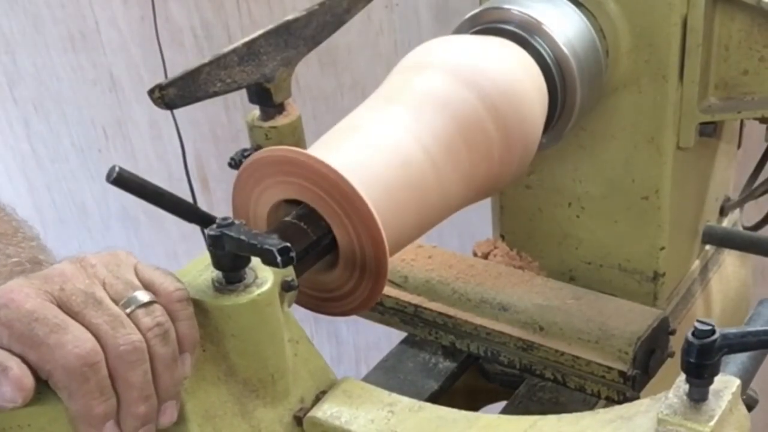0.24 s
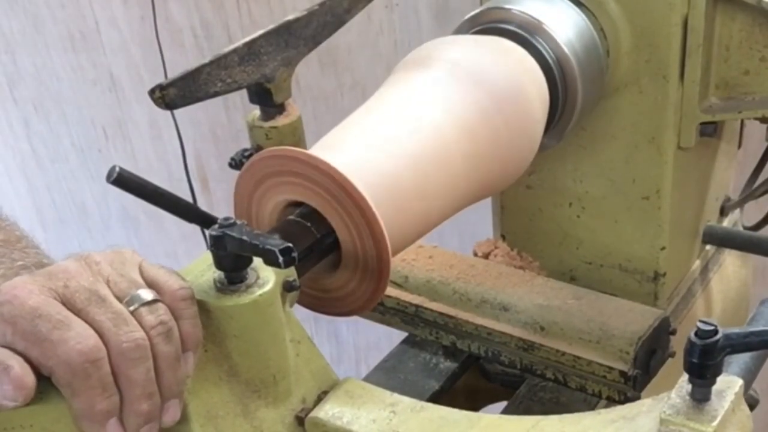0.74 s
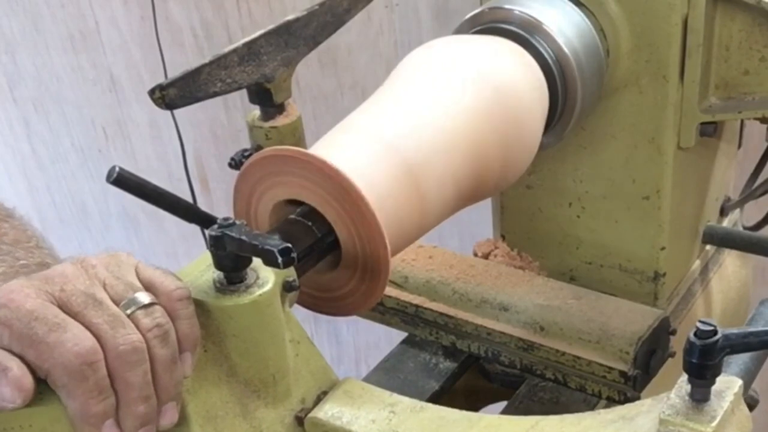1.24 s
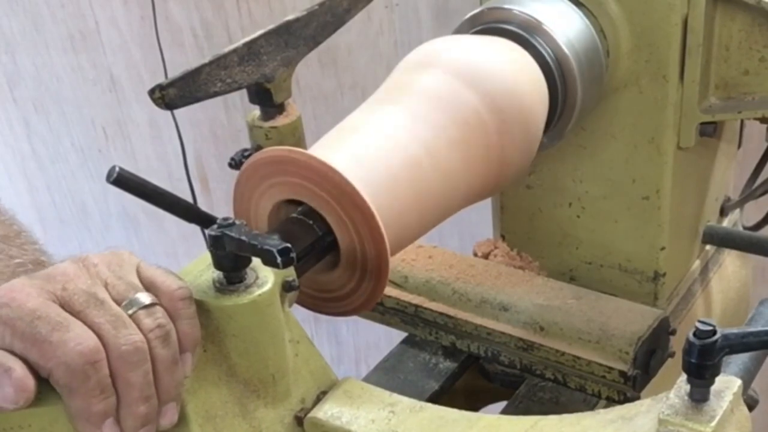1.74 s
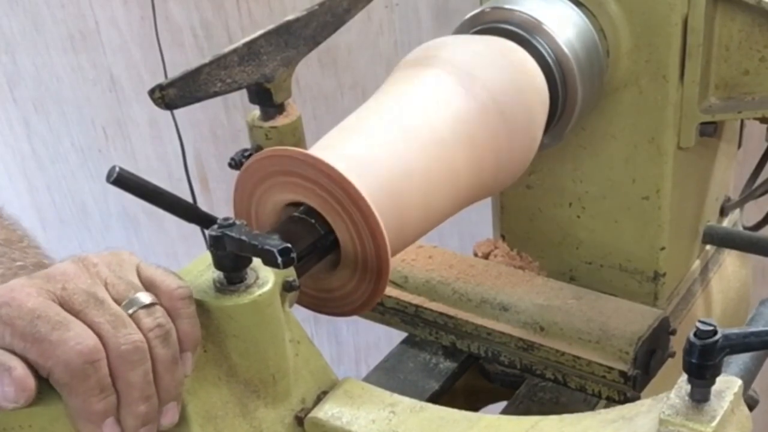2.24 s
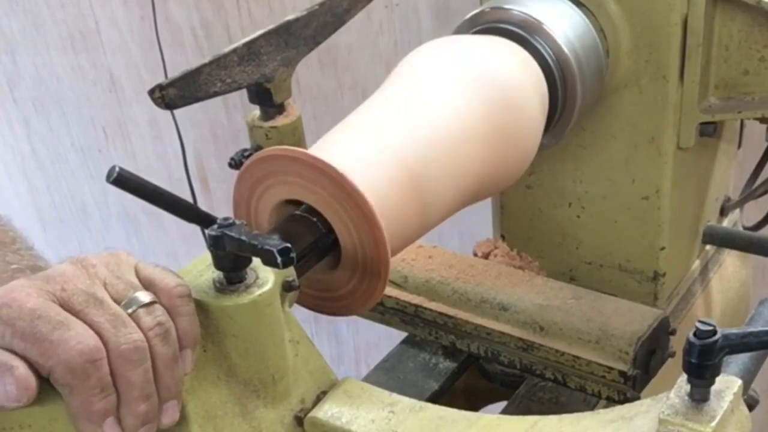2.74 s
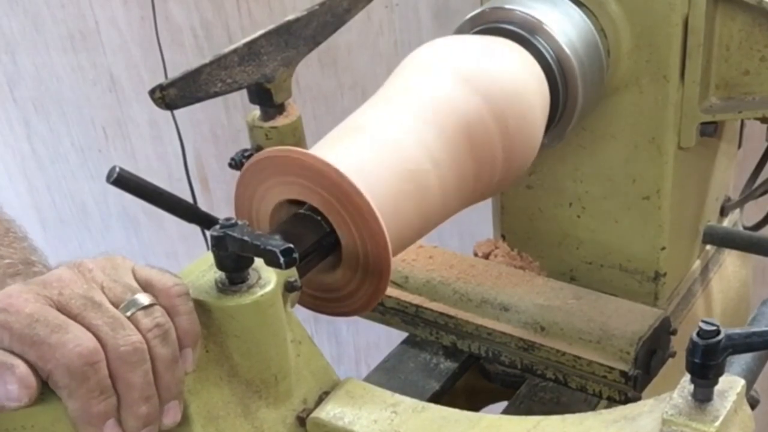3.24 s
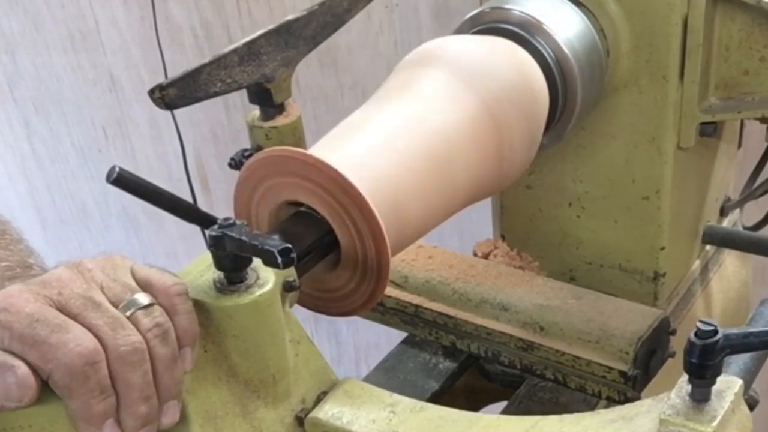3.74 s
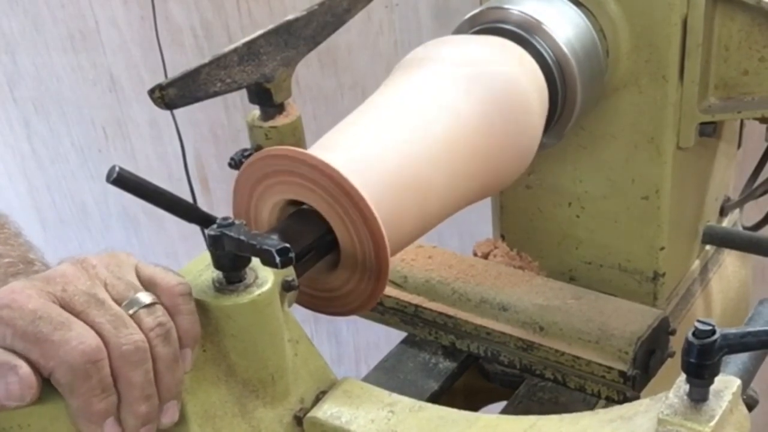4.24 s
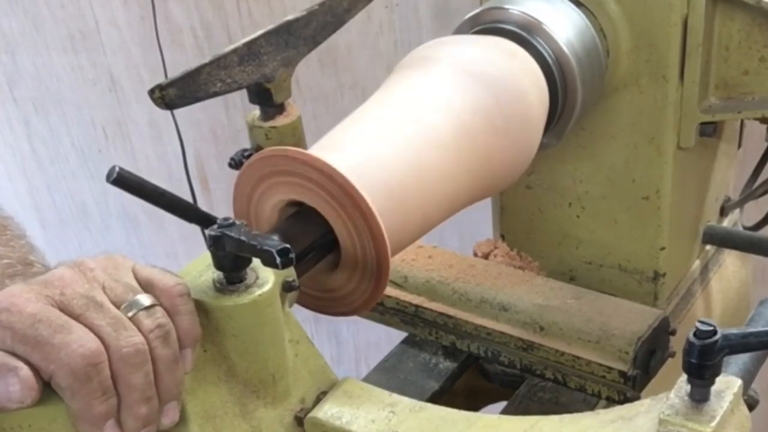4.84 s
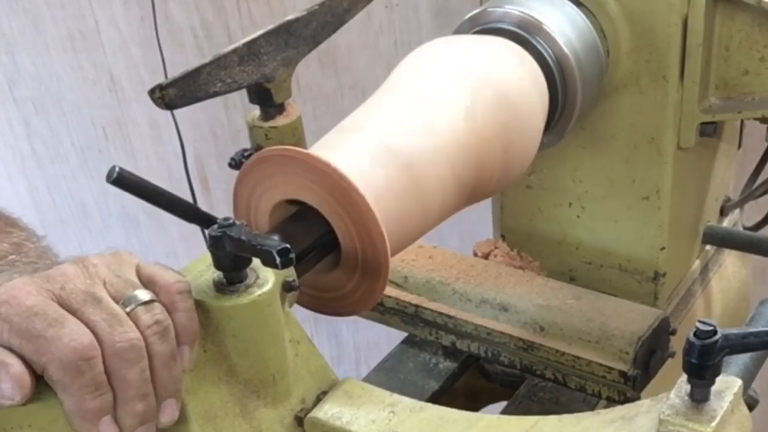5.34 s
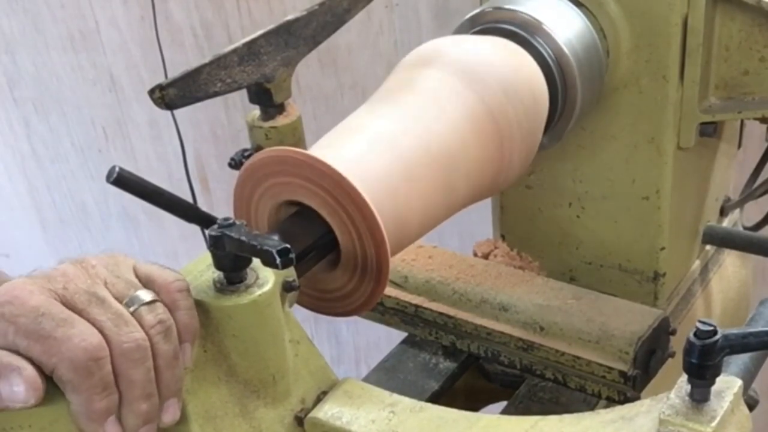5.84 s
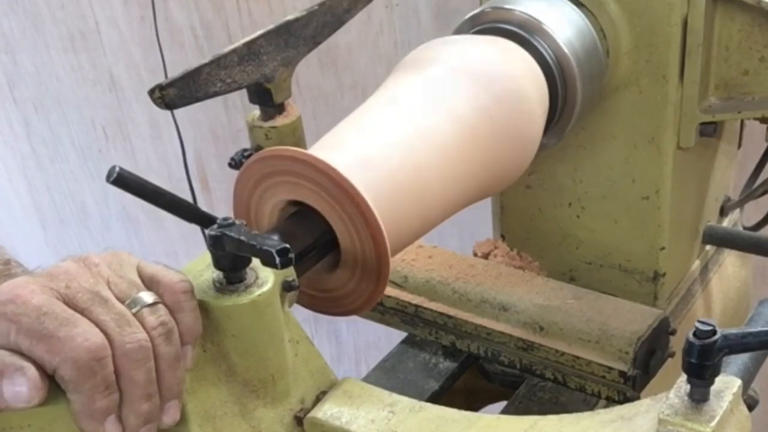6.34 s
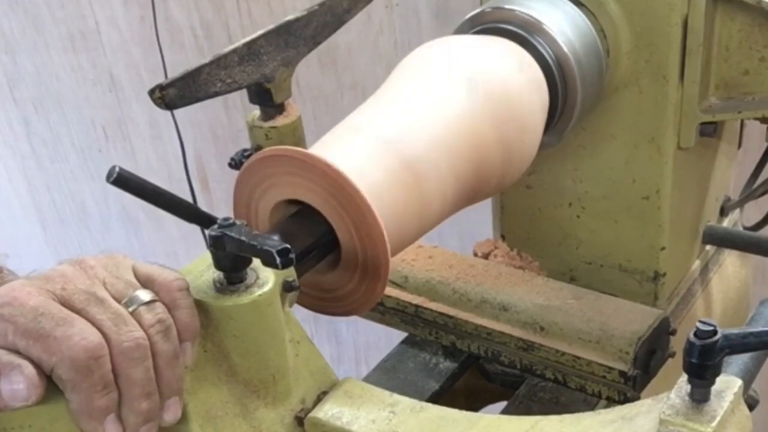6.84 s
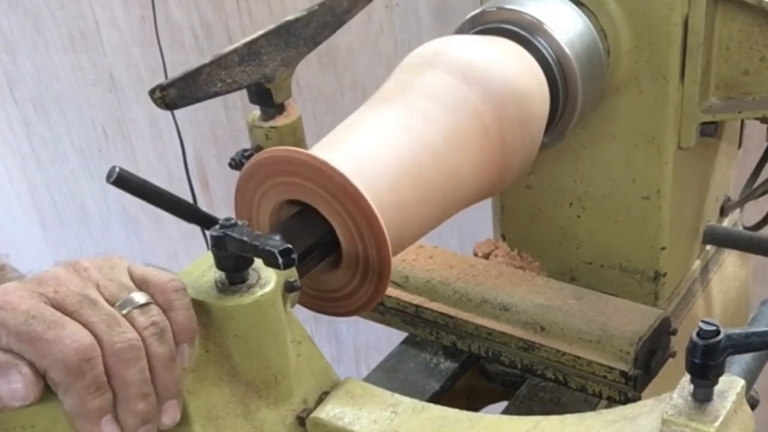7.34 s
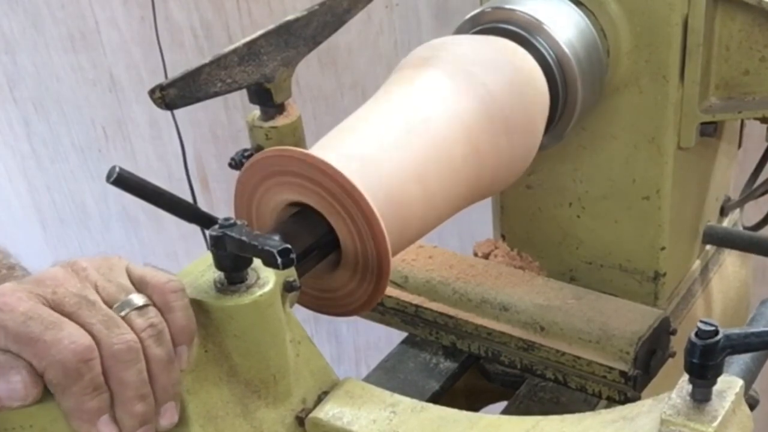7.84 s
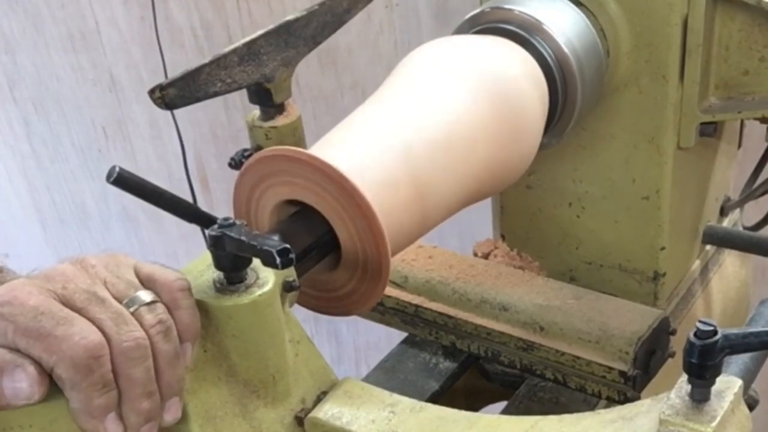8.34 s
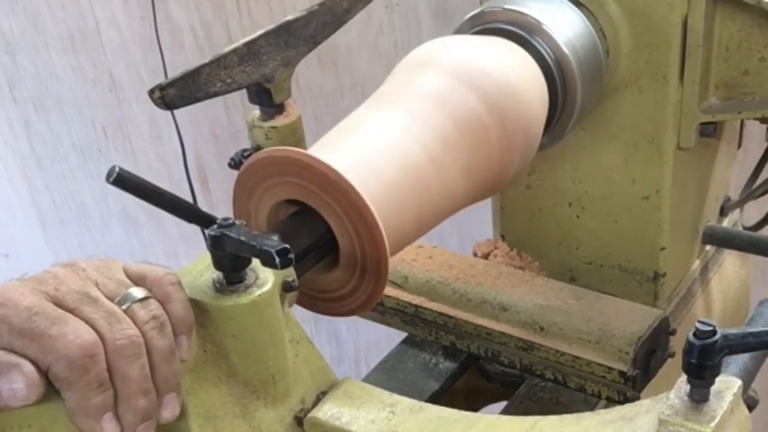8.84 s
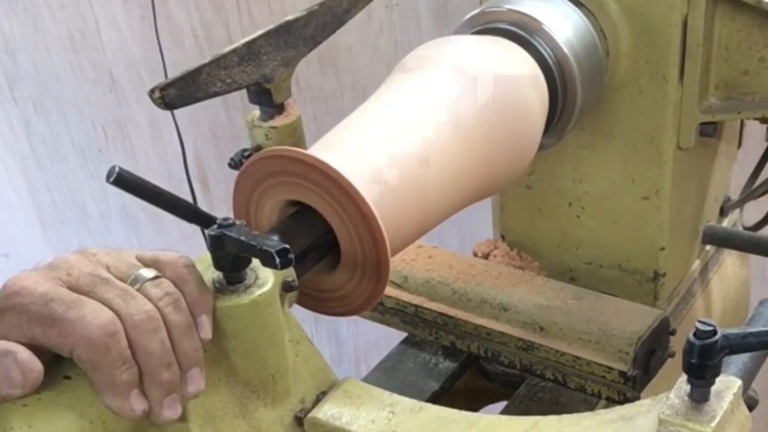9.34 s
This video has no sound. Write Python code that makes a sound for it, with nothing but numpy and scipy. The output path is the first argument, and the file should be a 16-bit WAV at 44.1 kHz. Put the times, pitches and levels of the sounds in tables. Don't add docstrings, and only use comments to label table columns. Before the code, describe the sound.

A hollowing tool bursts into pulsing squeals inside a spinning wooden vase, settles into long throbbing fibrous hiss, then stutters out over a low machine drone.

```python
import sys
import numpy as np
from scipy import signal
from scipy.fft import rfft, irfft, next_fast_len
from scipy.io import wavfile
from scipy.ndimage import uniform_filter1d, map_coordinates

SR = 44100
rng = np.random.default_rng(int(sys.argv[2]) if len(sys.argv) > 2 else 0)


def transcribe(u):
    v = np.clip(np.atleast_2d(u).T, -1, 1)
    q = np.round(v * 32767).astype(np.int16)
    wavfile.write(sys.argv[1], SR, q)


def invert_db(level):
    return 10 ** (np.asarray(level, dtype=float) / 20)


N = 423360
TIME = np.arange(N) / SR

TURNS_HZ = 14.6
# [t/s, offset/turns]
HIGH_SIDE = [(.6, 0.36), (1, 0.24), (1.4, 0.011), (2.2, -0.074), (3.4, -0.0083), (5.3, -0.017),
             (5.76, 0.071), (5.82, -0.43), (7, -0.304), (8.4, -0.38), (8.75, -.33), (9.15, -.22),
             (9.4, -.26)]
HARD_SPOTS = [
    (-.24, 1.35, 0.19, 1),
    (.03, 1.1, 0.19, 0),
    (.3, .25, .17, 0),
]
# [start t/s, end t/s, first bite level/dB, last bite level/dB,
# once-a-turn pulsing level/dB]
PUSHES = [(0.51, 1.05, -61.5, -60, 3.5), (1.062, 1.254, -65, -66, 1), (1.237, 2.317, -59.5, -59.5, 3.5),
          (2.286, 3.205, -58, -51.5, 4.5), (3.204, 4.38, -51.5, -51, 5), (4.426, 5.044, -51, -52.5, 4),
          (5.787, 6.162, -68, -56.5, 0.5), (6.15, 6.502, -59.5, -62.5, -0.5), (6.502, 6.76, -64.5, -73, -3),
          (7.13, 7.234, -74, -61.5, -6), (7.258, 7.698, -59.5, -64, 1), (7.73, 8.055, -59, -60, 2),
          (8.058, 8.2, -65.5, -77, 1.6), (8.569, 8.62, -69, -61.5, 4), (8.71, 9.173, -58, -63, 14.5),
          (9.17, 9.424, -77.5, -65, 24)]
EDGE_S = 0.018
TOUCH_S, LIFT_S = 0.483, 8.5
RESTING_DB, RESTING_PULSE_DB, CLEAR_DB = -71.5, 2, -90
# [f/Hz, level/dB per Hz]
RASP = [(900, -53), (1500, -29), (1750, -4), (2000, -0.5), (2300, 1.5), (2800, 0.5), (4100, -10),
        (5500, -11), (8000, -14), (15600, -54)]
# [f/Hz, level/dB per Hz]
HISS = [(1500, -74), (3000, -28.5), (4200, 0), (5500, -5), (7000, -3.5), (8900, 0), (9500, -6), (10700, -2),
        (13000, -6), (15600, -8.5)]
# [f/Hz, width/Hz, level/dB]
MODES_OF_WORK = [(1940, 35, 4.5), (2020, 19, 8.5), (2460, 20, -5), (2770, 49, -4), (2870, 130, 4),
                 (3024, 53, 5.5), (3490, 310, 6), (3600, 133, 5.5), (3930, 99, 4), (4193, 32, 2),
                 (4520, 66, -7), (5080, 30, -6), (5394, 120, 3), (5660, 210, -5), (6340, 126, -2),
                 (7800, 53, -37), (8250, 58, 2.5), (8660, 79, -0.5), (10450, 100, -3), (12160, 170, -4),
                 (14000, 67, 4)]
RASP_DB, RASP_FOLLOWS = -51, 0.47
FRESH_DB, FRESH_S = 7.5, 0.29
RASP_SKIPS, SKIPPING_DB = 0.6, 10.5
SKIP_S = .018
CROSS_HZ = 7800
RASP_PULSES, CHIPS_PULSE, DUST_PULSES = 1.05, 1.25, 1.3

# [middle t/s, tone level/dB, pitch f/Hz, slap level/dB]
ENTERING = [(.002, -53.5, 1660, -25), (.066, -61, 1682, -13), (.189, -51.5, 1684, -8.5),
            (.215, -52, 1610, -26), (.52, -30, 1838, -5.5), (.54, -34, 1810, -9.5), (.581, -27, 1828, -5.5),
            (.611, -37, 1800, -23), (.65, -35.5, 1775, -7.5), (.727, -24, 1870, -10.5),
            (.799, -26, 1888, -11.5), (.87, -28, 1913, -13), (.93, -27.5, 1887, -8), (.99, -30.5, 1904, -9),
            (1.063, -42, 1935, -20.5), (1.21, -33.5, 1936, -13), (1.278, -32, 1932, -14),
            (1.347, -39, 1936, -17), (1.414, -30.5, 1935, -13.5), (1.482, -37.5, 1936, -21),
            (1.611, -44.5, 1963, -12), (1.684, -39, 1943, -11.5), (1.752, -46, 1947, -12.5),
            (1.823, -28.5, 1928, -13.5), (1.896, -30.5, 1935, -17), (1.958, -35.5, 1945, -27),
            (2.011, -53, 1990, -14), (2.088, -47.5, 1990, -20.5), (2.156, -43, 1965, -16),
            (2.218, -50, 2004, -9)]
# [middle t/s, tone level/dB, pitch f/Hz, slap level/dB]
LEAVING = [(5.594, -59, 1860, -8), (5.656, -62, 1877, -14), (5.722, -42, 1824, -10), (5.762, -49, 1678, -7),
           (5.783, -44.5, 1810, 3), (5.833, -40, 1700, -10), (5.862, -38, 1812, -2.5),
           (5.967, -42, 1928, -13.5), (6.724, -46, 1972, -15), (6.793, -49, 1963, -8.5),
           (6.872, -41, 1950, -13.5), (6.956, -36, 1950, -15.5), (7.02, -29.5, 1922, -15.5),
           (7.081, -30, 1948, -11.5), (8.537, -45, 1820, -6.5), (8.588, -35, 1779, -2.5),
           (8.66, -40, 1720, -0.5), (8.726, -37, 1717, 2), (8.795, -37.5, 1714, 0.5),
           (8.862, -40, 1720, 2.5), (8.926, -41, 1718, 5), (8.992, -45, 1690, 5.5),
           (9.06, -40.5, 1707, 5.5), (9.13, -43, 1720, 5.5), (9.197, -44, 1623, 1.5),
           (9.227, -51, 1618, -25), (9.268, -37.5, 1601, -3.5), (9.336, -39.5, 1613, -1),
           (9.406, -41, 1608, 0), (9.449, -49, 1608, -8)]
BURST_S, LONGER_S_PER_DB, HARD_SLAP_DB, LONGEST_S = .027, -0.1, -7, .044
BACK_OUT_S, SHORTER = 9.17, .75
# [middle t/s, level/dB, half width/s]
SWELLS_IN = [(0.519, -25.5, 0.011), (0.533, -25.5, 0.0058), (0.547, -31, 0.0055), (0.565, -32, 0.027),
             (0.582, -22, 0.0048), (0.606, -29, 0.026), (0.641, -32, 0.017), (0.661, -27.5, 0.0063),
             (0.675, -42, 0.0053), (0.689, -43, 0.006), (0.718, -25.5, 0.0089), (0.736, -20, 0.0058),
             (0.745, -35, 0.018), (0.801, -24.5, 0.012), (0.844, -38, 0.006), (0.873, -25, 0.019),
             (0.922, -25.5, 0.012), (0.94, -22.5, 0.0057), (0.956, -31, 0.0088), (0.987, -26.5, 0.009),
             (1.014, -40, 0.0089), (1.031, -45, 0.006), (1.053, -43.8, 0.006), (1.068, -38.5, 0.009),
             (1.21, -29, 0.017), (1.239, -39, 0.03), (1.278, -26, 0.015), (1.345, -34, 0.012),
             (1.394, -38, 0.0069), (1.414, -28, 0.014), (1.44, -44, 0.03), (1.482, -33, 0.016),
             (1.598, -42.8, 0.008), (1.614, -40.3, 0.007), (1.628, -46, 0.006), (1.684, -38.5, 0.016),
             (1.754, -42, 0.014), (1.824, -24.5, 0.015), (1.859, -47.9, 0.03), (1.897, -28, 0.018),
             (1.959, -33.2, 0.013), (2.012, -45, 0.006), (2.084, -42, 0.006), (2.157, -41, 0.014),
             (2.219, -46.5, 0.006)]
# [middle t/s, level/dB, half width/s]
SWELLS_OUT = [(5.719, -40, 0.012), (5.746, -41, 0.006), (5.762, -38.2, 0.01), (5.779, -37, 0.0056),
              (5.801, -39.5, 0.016), (5.84, -37, 0.025), (5.866, -31, 0.028), (5.902, -43, 0.027),
              (5.937, -51, 0.014), (5.967, -38.5, 0.013), (6.717, -43.5, 0.007), (6.732, -43.5, 0.008),
              (6.86, -39, 0.0085), (6.879, -43, 0.018), (6.917, -46, 0.006), (6.934, -43, 0.0054),
              (6.956, -38.5, 0.018), (7.001, -36.1, 0.006), (7.024, -29, 0.017), (7.054, -43, 0.006),
              (7.08, -27.3, 0.012), (7.114, -47, 0.03), (8.588, -31.5, 0.016), (8.62, -40.5, 0.024),
              (8.66, -37, 0.0074), (8.681, -40, 0.016), (8.719, -34.5, 0.012), (8.741, -32, 0.0054),
              (8.764, -46, 0.006), (8.782, -34.5, 0.011), (8.81, -34.1, 0.008), (8.833, -53, 0.006),
              (8.855, -37.5, 0.011), (8.876, -38.1, 0.006), (8.91, -44, 0.0051), (8.925, -37, 0.006),
              (8.947, -40.9, 0.0097), (8.979, -41.5, 0.006), (8.993, -39, 0.011), (9.012, -40.5, 0.0072),
              (9.053, -36.7, 0.011), (9.079, -38, 0.0074), (9.122, -38.4, 0.011), (9.146, -39, 0.01),
              (9.187, -42, 0.016), (9.231, -41, 0.014), (9.26, -39.5, 0.015), (9.279, -40, 0.0085),
              (9.301, -41, 0.0098), (9.332, -39.5, 0.025), (9.407, -35.5, 0.015), (9.434, -41, 0.0049)]
# [middle t/s, level/dB, half width/s]
GRAZES = [(.004, -51.5, 0.011), (.066, -54, 0.011), (.187, -47, 0.0064), (.21, -50.5, 0.021),
          (1.13, -47, 0.014), (5.59, -48, 0.019), (5.656, -60, .014), (6.59, -54, .012), (6.654, -50, .012),
          (6.795, -48, 0.017), (7.15, -53, .014), (8.52, -49, .012), (8.55, -46.5, .014),
          (9.464, -49.5, 0.013)]
RISE, FALL = .75, 1.2
# [f/Hz, level/dB]
OVERTONES = [(3200, -8), (3440, -1.5), (3750, -5), (4900, -5.5), (5500, -4), (6450, -19), (7000, -11.5),
             (8100, -10), (8600, -15.5), (9300, -18), (9700, -30), (10300, -27), (11300, -16.5),
             (12100, -19.5), (14000, -29)]

# [t/s, bar pitch f/Hz, bar swing level/dB, grip on the rest level/dB]
SINGING = [(.45, 1885, -83, -85), (.55, 1858, -43, -63), (1.1, 1940, -55.5, -70), (2.8, 1964, -48.5, -60),
           (4, 2020, -54.5, -53), (5, 1965, -66, -54.5), (5.2, 1858, -60, -56.5), (5.65, 1846, -55, -63.5),
           (5.92, 1876, -44, -60.5), (6.05, 1960, -80, -65), (6.75, 1965, -55, -77), (7.1, 1937, -49, -72),
           (7.3, 2007, -70, -59), (8.4, 1940, -76, -77), (8.6, 1760, -46, -66), (9.15, 1713, -50, -62),
           (9.22, 1605, -58, -76), (9.5, 1610, -70, -74.5)]
SHANK_DB, SHANK_FOLLOWS = 0, 0.33

# [t/s, level/dB, pitch f/Hz, width/Hz, t60/s]
TOUCHES = [
    (.158, -51, 4800, 1500, .08),
    (.335, -53, 593, 150, 0.13),
    (.366, -51, 4460, 900, 0.065),
    (.46, -39, 4000, 3500, 0.07),
    (8.6, -55.5, 510, 89, 0.2),
    (9.505, -44, 3000, 2480, .06),
    (9.57, -45.5, 3200, 4000, 0.11),
    (9.575, -48, 900, 905, 0.19),
]

# [t/s, level/dB]
LOAD = [(0, -68.5), (.43, -66), (.53, -58.5), (1.4, -62), (3, -60), (4.3, -62), (5.5, -66), (7, -65.5),
        (7.9, -64), (8.7, -69.5), (9.5, -69), (9.6, -67)]
BED_DB, BED_FOLLOWS, BED_LAG_S = -64.5, 0.99, 1.5
BEARING_DB, BEARING_FOLLOWS = -62, 0.7
# [t/s, swell level/dB, length/s]
LEANS = [
    (2.295, 2.5, .4),
    (3.151, 0, 0.092),
    (4.298, 5, 0.79),
    (5.593, 10, 0.075),
    (6.07, 7, .12),
    (6.577, 6, 0.12),
    (7.807, 4.5, 0.16),
]
OPEN_S, OPENING_S, OPEN_DB = 8.82, 0.51, 6.5
# [f/Hz, level/dB per Hz]
DRONE = [(18, -74), (30, -44), (59, -27), (61, -15), (72, -17), (102, 7), (124, 3.5), (183, -28),
         (220, -11), (290, -36), (480, -120)]
# [f/Hz, level/dB per Hz]
RATTLE = [(88, -27), (150, 4), (184, -6.5), (227, -4), (270, -2.5), (321, -7), (505, -6.5), (674, -3.5),
          (779, -8.5), (909, -2.5), (1040, -10.5), (1210, -4.5), (1500, -15), (1950, -32), (3300, -120)]
# [multiple of the turn,
# level/dB]
ORDER_LINES = [(6, -9), (7, -2), (8, -0.5), (9, -23), (10, -13), (11, -11), (14, -13.5), (15, -11),
               (16, -9), (17, -10), (18, -21.5), (19, -19), (20, -10.5), (21, -13), (22, -6.5), (23, -22),
               (24, -15), (26, -18), (27, -12.5), (28, -20), (29.7, -9.5), (33, -16.5), (37, -20),
               (39.8, -11.5), (42, -23), (44.75, -8), (45.9, -11), (47.9, -8), (50, -18), (51, -16.5),
               (56, -15.5), (58, -16), (61, -20), (64, -12)]
# [f/Hz, level/dB per Hz]
SHOP_AIR = [(700, -51), (1300, -6), (1700, -4.5), (2500, -0.5), (3300, -12.5), (4600, -14), (6000, -20.5),
            (9300, -20.5), (12000, -29), (15600, -41)]
# [f/Hz, t60/s]
WALLS = [(1000, 0.23), (4000, 0.24), (12000, 0.016)]


def cut():
    hiss_db, pulsing_db = feed()
    fresh_db = FRESH_DB * np.exp(-np.abs(TIME - PUSHES[0][0]) / FRESH_S) * (TIME > TOUCH_S)
    skipped_db = RASP_SKIPS * np.clip(pulsing_db - SKIPPING_DB, 0, None)
    rasp_db = RASP_DB + RASP_FOLLOWS * (hiss_db + 58.0) + fresh_db - skipped_db
    uneven = .4 * wobble(9) + .5 * wobble(60) + .8 * wobble(250)
    snaps = (rng.random(N) < 3000 / SR) * rng.standard_normal(N)
    fibres = unit(patchy_noise(patchy_db=2.5) + 0.44 * unit(snaps))

    def chips(hz):
        return 1 / (1 + (hz / CROSS_HZ) ** 8)

    def dust(hz):
        return 1 - chips(hz)

    def layer(spectrum, level_db, depth, early, part):
        own_db = .7 * wobble(30)
        pulse_db = np.clip(pulsing_db, 0, 16) * wall_pressure(early, pulsing_db)
        bite = invert_db(depth * (pulse_db + uneven) + own_db)
        bite /= np.sqrt(np.abs(uniform_filter1d(bite ** 2, size=int(2 * SR / TURNS_HZ))))

        def voice(hz):
            return colour(spectrum)(hz) * work_modes(hz)

        scale = np.std(filtered(fibres, voice))
        return filtered(invert_db(level_db) * bite * fibres, lambda hz: voice(hz) * part(hz)) / scale

    rasp = layer(RASP, rasp_db + 2, RASP_PULSES, .08, np.ones_like)
    chip_hiss = layer(HISS, hiss_db + 10.0, CHIPS_PULSE, .08, chips)
    dust_hiss = layer(HISS, hiss_db + 10.5, DUST_PULSES, .01, dust)
    return rasp + chip_hiss + dust_hiss


def feed():
    power = invert_db(CLEAR_DB) ** 2 + invert_db(RESTING_DB) ** 2 * between(TOUCH_S, LIFT_S)
    pulsing = RESTING_PULSE_DB * power
    for start, end, first_db, last_db, pulse_db in PUSHES:
        push_db = np.interp(TIME, [start, end], [first_db, last_db])
        push = invert_db(push_db) ** 2 * between(start, end)
        power, pulsing = power + push, pulsing + pulse_db * push
    return 10 * np.log10(power), pulsing / power


def between(start, end):
    return (np.tanh((TIME - start) / EDGE_S) - np.tanh((TIME - end) / EDGE_S)) / 2


def wall_angle():
    return TURNS_HZ * TIME + curves(HIGH_SIDE)[0]


def wall_pressure(early, pulsing_db):
    angle, pressure = wall_angle(), 0
    for place, hardness, fade, leads in HARD_SPOTS:
        turn, since = np.divmod(angle - place + early * leads + 2, 1)
        this_turn = 1 + .07 * rng.standard_normal(200)[turn.astype(int)]
        pressure = pressure + hardness * this_turn * np.exp(-(since / fade) ** 2)
    pressure = uniform_filter1d(pressure, size=260)
    skipping = np.clip((pulsing_db - SKIPPING_DB) / 4, 0, 1)
    swell = uniform_filter1d(pressure, size=int(SKIP_S * SR))
    swell = uniform_filter1d(swell, size=int(SKIP_S * SR / 2))
    swell = np.roll(swell, int(SKIP_S * SR / 4))
    pressure = (1 - skipping) * pressure + skipping * swell
    return 1.25 * (pressure - pressure.mean())


def patchy_noise(patchy_db):
    z = signal.stft(rng.standard_normal(N), nperseg=256)[2]
    field = uniform_filter1d(rng.standard_normal(z.shape), size=5, axis=0)
    field = uniform_filter1d(field, size=4, axis=1)
    return unit(signal.istft(z * invert_db(patchy_db * unit(field)), nperseg=256)[1][:N])


def work_modes(hz):
    return 1 + sum(invert_db(db) * 1j * hz * w / (c * c - hz * hz + 1j * hz * w) for c, w, db in MODES_OF_WORK)


def squeal():
    s, tone_db, hz, over_db = np.transpose(list(ENTERING) + list(LEAVING))
    length = np.clip(BURST_S + LONGER_S_PER_DB * (over_db - HARD_SLAP_DB), BURST_S, LONGEST_S)
    length = length * np.where(s > BACK_OUT_S, SHORTER, 1)
    slap, load = slaps(s, tone_db + over_db, length)
    slapping_db = np.interp(TIME, s, over_db)
    rough = np.clip((slapping_db + 17) / 18, .12, .6)

    knots = np.ravel([s - length / 3, s + length / 3], order="F")
    pitch = np.interp(TIME, np.sort(knots), np.repeat(hz, 2))
    pitch = pitch * (1 + rough * (.03 * (load - .7) + .005 * wobble(90)) + .002 * wobble(30))
    phase = 2 * np.pi * np.cumsum(pitch) / SR

    carrier = .95 + np.sqrt(rough) * (.16 * fuzz(200) + .2 * fuzz(600))
    tone = bar_swing() * np.real(carrier * np.exp(1j * phase))
    for k in range(2, 9):
        level = invert_db(along(OVERTONES, k * pitch) + 0.15 * (k - 2.0) * slapping_db)
        grain = .78 + .55 * fuzz(220) + .22 * fuzz(800)
        tone += slap * level * np.real(grain * np.exp(1j * k * phase))

    half = slap * load ** 3 * invert_db(-14.5 + .5 * slapping_db + 3.2 * wobble(23.7))
    for k, share in ((1.5, .45), (2.5, 1), (3.5, .35)):
        tone += half * share * np.real((.6 + .6 * fuzz(200)) * np.exp(1j * k * phase))
    return np.sqrt(2) * tone


def slaps(middles, levels_db, lengths):
    slap, load = np.zeros(N), np.zeros(N)
    for mid, db, span in zip(middles, levels_db, lengths):
        near = slice(max(0, int((mid - 2 * span) * SR)), int((mid + 3 * span) * SR))
        x = (TIME[near] - mid) / span + 0.12
        slap[near] += invert_db(db + 1.0) * np.exp(-np.abs(x / np.where(x < 0, .42, .66)) ** 4.1)
        load[near] += np.exp(-((x - .2) / .5) ** 2)
    return slap, load


def bar_swing():
    swing = np.zeros(N)
    for i, (mid, db, width) in enumerate(list(SWELLS_IN) + list(SWELLS_OUT) + list(GRAZES)):
        near = slice(max(0, int((mid - .1) * SR)), int((mid + .1) * SR))
        x = (TIME[near] - mid) / width + .15
        swing[near] += (-1) ** i * invert_db(db) * np.exp(-(x / np.where(x < 0, RISE, FALL)) ** 2)
    return swing


def singing():
    bar_hz, bar_db, rest_db = curves(SINGING)
    shank_db = rest_db + SHANK_DB + SHANK_FOLLOWS * (feed()[0] + 60)
    turn = 2 * np.pi * wall_angle()

    def band(hz, rate):
        return np.real(fuzz(rate) * np.exp(2j * np.pi * np.cumsum(hz) / SR))

    bar = invert_db(bar_db - 4 + 7 * np.cos(turn - 2.8)) * band(bar_hz, rate=190)
    rest = invert_db(rest_db - 2 + 4 * np.cos(turn)) * band(np.full(N, 3455), rate=140)
    shank_hz = 5490 + 90 * np.sin(turn - .4)
    shank = invert_db(shank_db - 5 + 10 * np.cos(turn - .4)) * band(shank_hz, rate=140)
    tick_hz = 8750 + 600 * np.sin(turn + .45)
    tick = invert_db(shank_db - 36 + 38 * np.cos(turn + .45)) * band(tick_hz, rate=700)
    return np.sqrt(2) * (bar + rest + shank + invert_db(4.0) * tick)


def touches():
    out, t = np.zeros(N + SR), np.arange(SR // 4) / SR
    hz = np.fft.rfftfreq(len(t), 1 / SR)
    for s, db, pitch_hz, width_hz, t60 in TOUCHES:
        ring = 1j * hz * width_hz / (pitch_hz ** 2 - hz ** 2 + 1j * hz * width_hz)
        scuff = unit(irfft(rfft(rng.standard_normal(len(t))) * ring ** 2, len(t)))
        fade = invert_db(db - 60 * t / t60) * (1 - np.exp(-t / 0.0071))
        out[round(s * SR):][:len(t)] += fade * scuff
    return out[:N]


def machine():
    belt_db, = curves(LOAD)
    opening_db = OPEN_DB * (1 + np.tanh((TIME - OPEN_S) / OPENING_S)) / 2
    bearing_db = BEARING_DB + BEARING_FOLLOWS * (belt_db + 63.5) + opening_db
    drone_db = BED_DB + BED_FOLLOWS * uniform_filter1d(belt_db + 63, size=int(BED_LAG_S * SR))
    for s, db, span in LEANS:
        drone_db = drone_db + db * np.exp(-((TIME - s) / span) ** 2)

    def noise(spectrum):
        return unit(filtered(rng.standard_normal(N), colour(spectrum)))

    low, high = np.zeros(N), np.zeros(N)
    for k, db in ORDER_LINES:
        level = invert_db(db + 2.83 * wobble(1.48) + 1.4 * wobble(0.5))
        line = level * np.sin(2 * np.pi * k * TURNS_HZ * TIME + 0.48 * k ** 0.26 * wobble(1.598))
        if k < 12:
            low += line
        else:
            high += line
    drone = invert_db(drone_db) * (0.73 * invert_db(1.5 * wobble(5.9)) * noise(DRONE) + 0.7 * low)
    rattle = 0.64 * invert_db(0.97 * wobble(14)) * noise(RATTLE) + 0.54 * high
    belt = filtered(rattle, lambda hz: 1 / (1 + (hz / 520) ** 6))
    bearings = rattle - belt
    air = invert_db(-61 + 2.1 * wobble(8)) * noise(SHOP_AIR)
    return drone + invert_db(belt_db) * unit(belt) + invert_db(bearing_db) * unit(bearings) + air


def shop(x):
    hz, t, z = signal.stft(rng.standard_normal(SR // 2), SR, nperseg=256)
    tail = signal.istft(z * invert_db(-60 * t / along(WALLS, hz)[:, None]), SR, nperseg=256)[1]
    late = np.pad(x, (300, 0))
    return signal.fftconvolve(late, tail / np.linalg.norm(tail))[:N]


def unit(x):
    return x / np.sqrt(np.mean(x ** 2) + 1e-20)


def along(points, hz):
    f, v = np.transpose(points)
    return np.interp(np.log(hz + 1), np.log(f + 1), v)


def curves(rows):
    s, *cols = np.transpose(rows)
    return [np.interp(TIME, s, c) for c in cols]


def wobble(rate):
    knots = rng.standard_normal(int(N * rate / SR) + 4)
    return unit(map_coordinates(knots, [TIME * rate]))


def fuzz(rate):
    return (wobble(rate) + 1j * wobble(rate)) / np.sqrt(2)


def filtered(x, response):
    m = next_fast_len(N + SR // 2)
    return irfft(rfft(x, m) * response(np.fft.rfftfreq(m, 1 / SR)), m)[:N]


def colour(points):
    return lambda hz: invert_db(along(points, hz)) * (hz > points[0][0])


def scene():
    chatter = squeal() + singing()
    tearing = cut()
    echo = shop(invert_db(-12.5) * chatter + invert_db(-10) * tearing)
    return (chatter + tearing + echo + machine() + touches())[None]


def band_limit(x):
    return signal.sosfilt(signal.butter(12, 15730, fs=SR, output="sos"), x)


def record(dry):
    return band_limit(dry)


dry = scene()
out = record(dry)
transcribe(out)
```